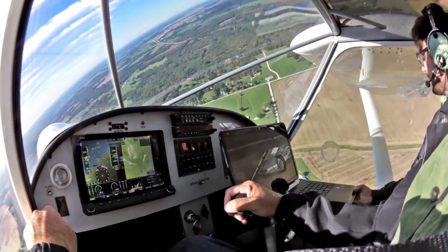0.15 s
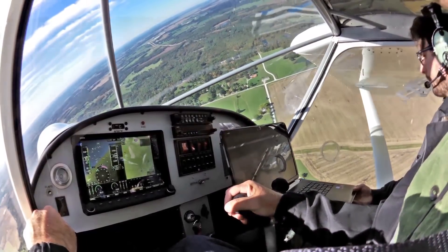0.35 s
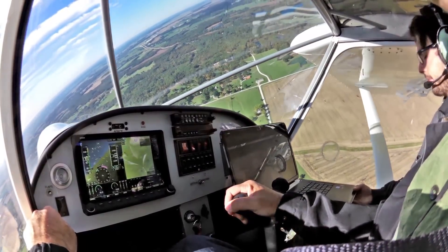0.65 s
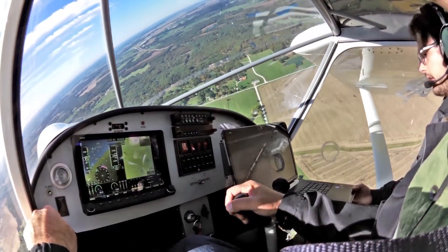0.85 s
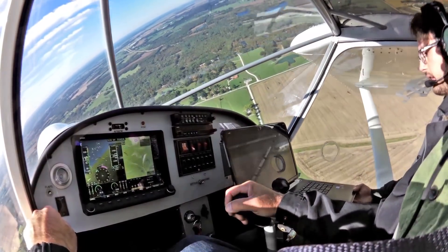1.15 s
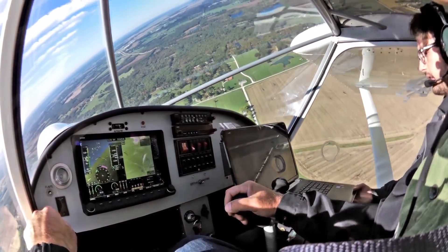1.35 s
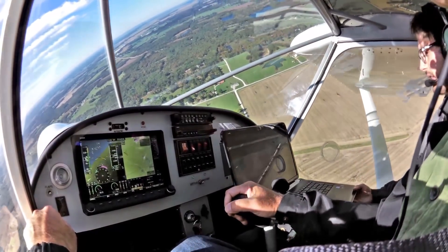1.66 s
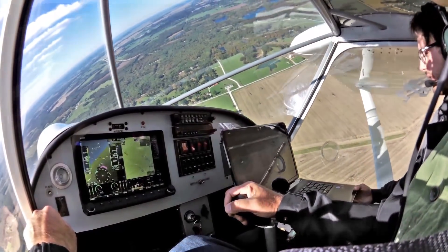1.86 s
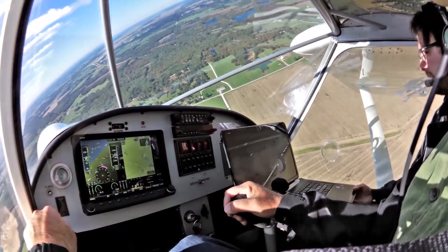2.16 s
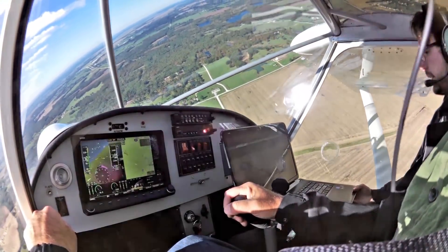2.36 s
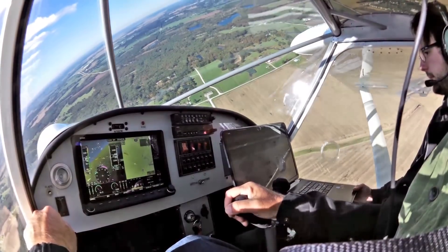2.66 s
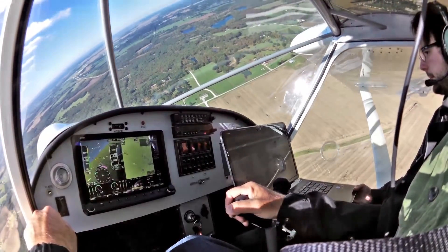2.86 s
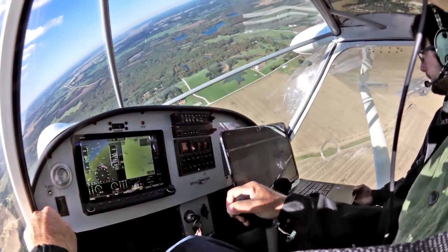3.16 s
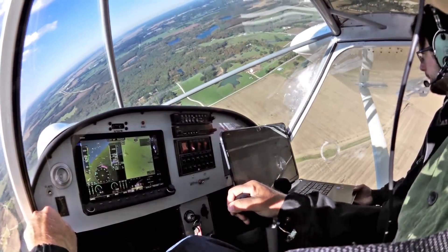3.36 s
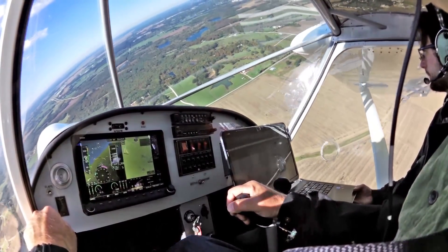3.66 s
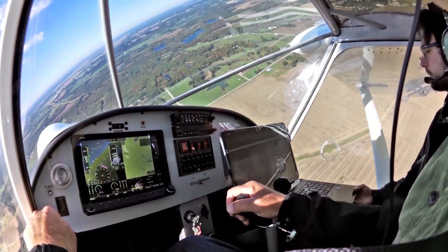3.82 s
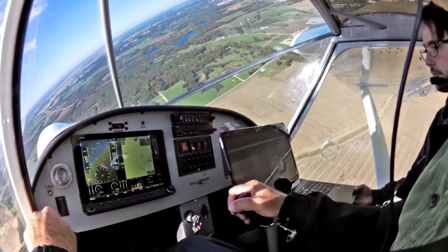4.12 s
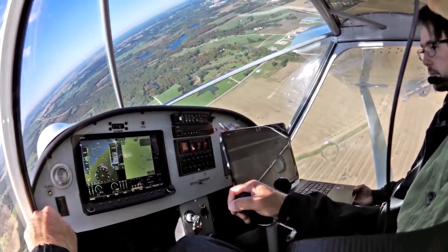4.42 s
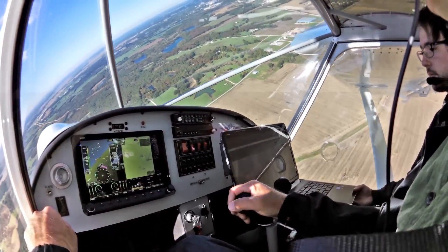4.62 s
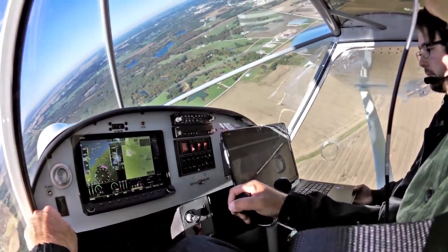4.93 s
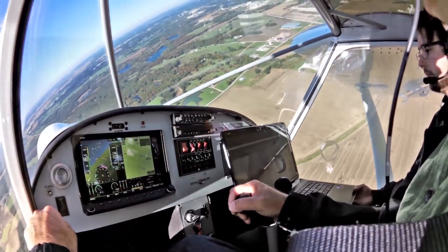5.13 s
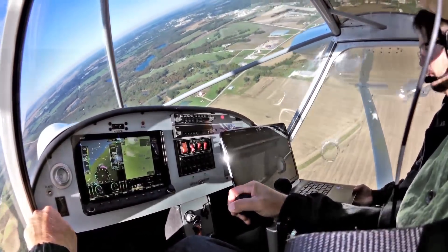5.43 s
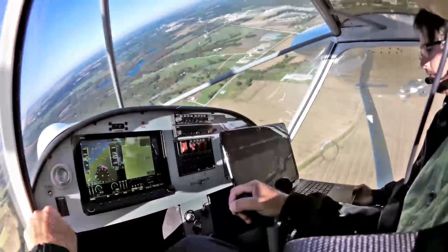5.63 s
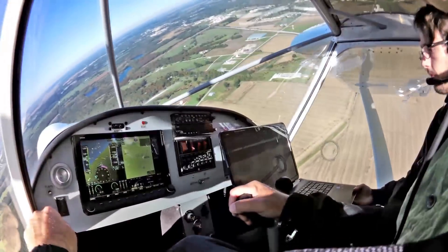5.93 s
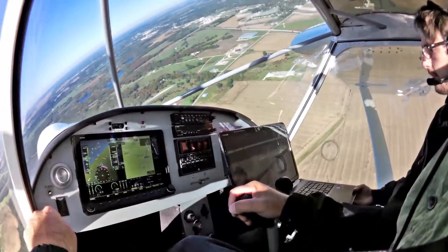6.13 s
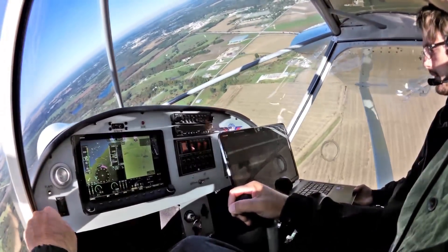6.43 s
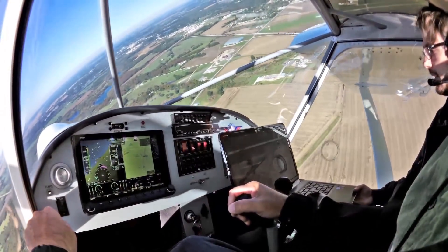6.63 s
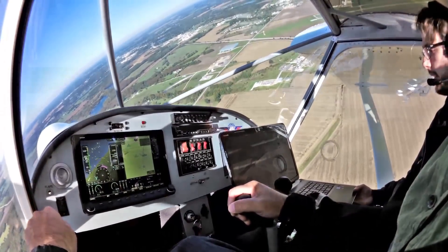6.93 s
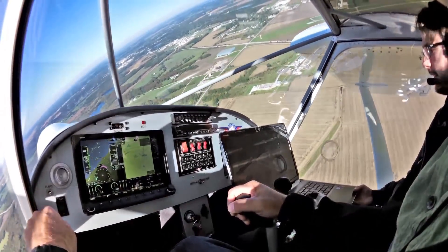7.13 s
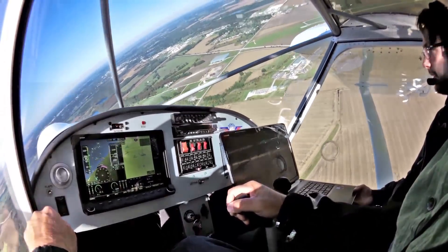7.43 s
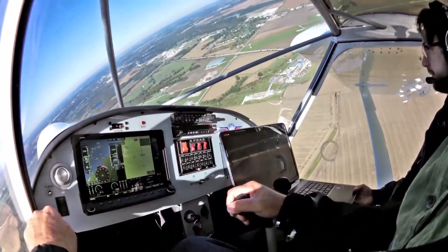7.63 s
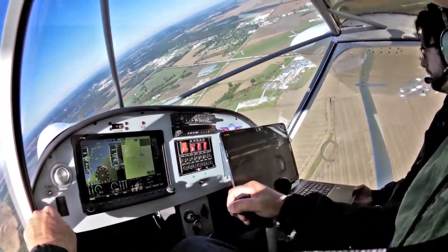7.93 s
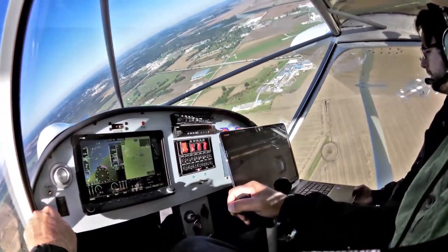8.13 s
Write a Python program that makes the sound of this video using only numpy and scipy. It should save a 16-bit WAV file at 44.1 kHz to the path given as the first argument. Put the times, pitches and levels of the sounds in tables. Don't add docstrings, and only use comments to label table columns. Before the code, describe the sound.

The sound starts mid-flight inside a small propeller aircraft, with a slight low jolt of rough air. A deep engine and propeller drone, around 75 pulses per second with strong buzzing harmonics, runs throughout, swaying slightly. Over it lies a steady, dark roar of air on the thin cabin skin, fluttering and gently gusting. Faint valve clatter, fine electrical ticking and slight hiss sit beneath. Around 1.4 s the drone's second harmonic dips; a lone soft tap comes at 2.3 s. Near 4.5 s the engine pitch rises very slightly, then the drone thins markedly about 5 s. A loose part taps faintly at 5.0, then quickly between 5.3 and 5.6 s, and once at 6.6 s, as the ticking weakens. Around 7.8 s low rumble swells with a dull tap, the drone fades again, and a brighter tap lands at 8.1 s before the cut at about 8.3 s.

```python
import sys
import numpy as np
from scipy import signal
from scipy.fft import rfft, irfft
from scipy.io import wavfile
from scipy.ndimage import uniform_filter1d

SR = 44100
rng = np.random.default_rng(int(sys.argv[2]) if len(sys.argv) > 2 else 0)


def gain_from_decibels(decibels):
    exponent = np.asarray(decibels, float) / 20
    return 10 ** exponent


def generate_wav(signal):
    frames = np.transpose(np.atleast_2d(signal))
    scaled = np.clip(frames, -1, 1) * 32767
    pcm = np.round(scaled).astype(np.int16)
    wavfile.write(sys.argv[1], SR, pcm)


N = 365148
T = np.arange(N) / SR
HZ = np.maximum(np.arange(N // 2 + 1) * SR / N, 1)


def level(x, db):
    return x * gain_from_decibels(db) / np.sqrt(np.mean(x ** 2))


def shape_db(points):
    hz, db = np.transpose(points)
    return np.interp(np.log(HZ), np.log(hz), db)


def causal(x, db):
    cepstrum = irfft(np.log(gain_from_decibels(db)), N)
    cepstrum[1:N // 2] *= 2
    cepstrum[N // 2 + 1:] = 0
    return irfft(rfft(x) * np.exp(rfft(cepstrum)), N)


def walk(rate_hz):
    hold = int(SR / rate_hz)
    steps = np.repeat(rng.standard_normal(N // hold + 1), hold)
    wander = uniform_filter1d(uniform_filter1d(steps, hold), hold)[:N]
    return (wander - wander.mean()) / wander.std()


def flutter(rate_hz):
    wander = walk(rate_hz)
    wander = wander - uniform_filter1d(wander, size=SR // 9)
    return wander / wander.std()


def hump(s, half_s):
    return np.exp(-((T - s) / half_s) ** 2)


def ticks(angle, places, sizes):
    at = np.interp(places, angle, np.arange(N), left=-1, right=-1)
    keep = (at >= 8) & (at < N - 8)
    index = at[keep].astype(int)[:, None] + np.arange(-5, 7)
    offset = index - at[keep][:, None]
    window = np.cos(np.pi * offset / 12) ** 2
    click = sizes[keep][:, None] * np.sinc(offset) * window
    return np.bincount(index.ravel(), click.ravel(), N)


BLADE_DB = [-27.5, -24.5, -28.5]
# (multiple of the two-turn engine cycle, level [dB rms])
WEAK_TONES = [(2, -45.3), (6, -39.2), (14, -36.4), (15, -45.6), (16, -42.5), (17, -46.8), (20, -45.4),
              (22, -40.8), (25, -45.2), (27, -48.0), (32, -51.5), (34, -46), (36, -49.3), (37, -41.3),
              (38, -52.6), (40, -59.5), (41, -47.6), (42, -54.4), (43, -56.9), (46, -58.6), (50, -61.6),
              (51, -62.8), (54, -63.0), (60, -56), (64, -67.5), (68, -66.8)]
# (time [s], half length [s], firing tone [dB], 2nd harmonic [dB], 3rd harmonic [dB])
BANKING_FADES = [
    (.2, .4, -1, 1.5, -1),
    (1.35, .6, 1.5, -6, 1),
    (3.5, .3, 1, -2, -2.5),
    (5.0, 0.31, -4, -7, -13),
    (5.75, .4, -1.5, -0.5, -5),
    (7.15, .25, -1, 0, 0.5),
    (8.0, .6, -2, -6.5, -9.5),
]


def drone(cycle):
    fade_db = sum(np.outer(depth_db, hump(s, half_s)) for s, half_s, *depth_db in BANKING_FADES)
    blade_tones = [(4 * k + 4, db + fade_db[k]) for k, db in enumerate(BLADE_DB)]
    out = 0
    for order, db in blade_tones + list(WEAK_TONES):
        sway = min(.015 * order, .7)
        phase = 2 * np.pi * (order * cycle + rng.random()) + sway * walk(1.516)
        strength = gain_from_decibels(db + 2.2 * sway * walk(3.2))
        out = out + strength * np.sqrt(2) * np.sin(phase)
    return out


# (frequency [Hz], level [dB per Hz])
SKIN_SPECTRUM = [(22, -41), (40, -17), (56, -16), (80, -4.5), (130, -2.5), (300, -5.5), (600, -11.5),
                 (1000, -21.5), (1600, -31.5), (2500, -37), (3800, -41), (5000, -55.5), (7000, -75),
                 (11000, -82)]
# (frequency [Hz], width [Hz], level [dB])
CABIN_RESONANCES = [(112, 59, 1), (202.4, 45, 6), (267, 11, 1.5), (318, 44, 1), (375, 25, -2.5),
                    (413, 32, 3.5), (473.6, 56, 6.5), (551.6, 37, 5), (663, 11, 1.5), (1104, 95, 3.5),
                    (1380, 72, 4.5), (3000, 60, 3.5), (4380, 460, 2.5)]


def cabin_db():
    resonances_db = sum(db / (1 + (2 * (HZ - hz) / width) ** 2) for hz, width, db in CABIN_RESONANCES)
    return shape_db(SKIN_SPECTRUM) + resonances_db


# (time [s], level [dB])
GUSTS = [(0, -.5), (.45, -0.7), (1.4, .5), (2.5, -0.5), (3.65, 0.15), (4.15, -1.1), (4.7, 0.6), (5.65, 1),
         (5.95, -1.15), (6.5, -0.5), (7.2, -1), (7.7, 1.1), (8.28, 0.1)]
# (time [s], half length [s], rumble level [dB])
AIR_BUMPS = [
    (0.05, 0.21, 3),
    (3.5, .35, -0.5),
    (7.8, .4, 2.5),
]
SWELL_HZ = [110, 380, 1100, 2700]
GUST_FOLLOWING = [.2, 1.4, 1.2, .8]
EDDY_SPREAD_DB = [.8, .4, .35, .2]
SWELL_BALANCE_DB = [0, .3, .2, -1.2]


def airflow():
    gust_db = np.interp(T, *np.transpose(GUSTS))
    swells_db = np.array([db + share * gust_db + eddy_db * walk(4.)
                          for db, share, eddy_db in zip(SWELL_BALANCE_DB, GUST_FOLLOWING, EDDY_SPREAD_DB)])
    swells_db[0] += sum(db * hump(s, half_s) for s, half_s, db in AIR_BUMPS)
    noise = rfft(rng.standard_normal(N)) * gain_from_decibels(cabin_db())
    low_buffet, high_buffet = flutter(50), flutter(46)
    out = 0
    for k in range(20):
        centre_hz = 16 * 2 ** (k / 2)
        band = np.cos(np.pi * np.clip(np.log2(HZ / centre_hz), -.5, .5)) ** 2
        shares = np.array([np.interp(np.log(centre_hz), np.log(SWELL_HZ), one) for one in np.eye(4)])
        swell_db = shares @ swells_db
        high = np.clip(np.log2(centre_hz / 300), 0, 1)
        buffet_db = 1.1 * (1 - high) * low_buffet + (.5 + .45 * high) * high_buffet
        flicker_db = 0.21 * flutter(25)
        out = out + irfft(noise * band, N) * gain_from_decibels(swell_db + buffet_db + flicker_db)
    return level(out, -20.5)


def clatter(cycle):
    places, sizes = rng.random(90), rng.standard_normal(90)
    turns = np.arange(-1, 160)[:, None]
    uneven = gain_from_decibels(1.5 * rng.standard_normal((161, 90)))
    knocks = ticks(cycle, (turns + places).ravel(), (sizes * uneven).ravel())
    bright_db = shape_db([(700, -28.5), (1500, 1.0), (5000, 0.5)])
    return level(causal(knocks, cabin_db() + bright_db), -55)


# (frequency [Hz], level [dB per Hz])
CABLE_SPECTRUM = [(300, -12), (1200, -2), (2500, 0), (3800, -1.5), (4500, -4.5), (5500, -9), (8000, -18.5),
                  (11500, -32.5), (14000, -44)]
CYLINDER_SHIFT = np.array([0, -.006, 0, .001])


def electrics(firing, spark_db):
    n, m = np.arange(640), np.arange(640 * 9)
    late, strength = rng.standard_normal((640, 2)).T
    scatter_db = 1 - .25 * np.interp(n, firing, spark_db)
    spark_places = n + np.take(CYLINDER_SHIFT, n % 4) + .0012 * late
    sparks = ticks(firing, spark_places, gain_from_decibels(scatter_db * strength))

    pole_db, pole_shift = 2.5 * rng.standard_normal(36), .02 * rng.standard_normal(36)
    diode_places = (m + .3) / 9 + pole_shift[m % 36] + .003 * rng.standard_normal(len(m))
    diode_db = pole_db[m % 36] + 2.5 * rng.standard_normal(len(m))
    ripple = ticks(firing, diode_places, gain_from_decibels(diode_db))

    cable_db = shape_db(CABLE_SPECTRUM)
    hiss = level(causal(rng.standard_normal(N), cable_db), -66.5)
    spark_ticks = gain_from_decibels(spark_db) * level(causal(sparks, cable_db), -57.5)
    alternator_ticks = level(causal(ripple, cable_db), -63.5)
    return spark_ticks - alternator_ticks + hiss


# (time [s], peak level [dB], ringing pitch [Hz])
PANEL_TAPS = [
    (2.3486, -38.5, 3460),
    (4.9501, -42, 3000),
    (5.2649, -40, 3400),
    (5.449, -39, 3240),
    (5.5548, -39, 3260),
    (6.6089, -40, 3260),
    (7.7433, -40, 3060),
    (8.1075, -33, 3700),
]


def rattle():
    out, t = np.zeros(N), T[:1024]
    burst_hz = np.arange(513) * SR / 1024
    age = t / .001
    swell_and_die = age ** 2 * np.exp(2 - age) / 4
    for s, db, hz in PANEL_TAPS:
        near_pitch = np.exp(-((burst_hz - hz) / 800) ** 2)
        scrape = irfft(rfft(rng.standard_normal(1024)) * near_pitch)
        ring = 0.7 * np.sin(2 * np.pi * hz * t) + level(scrape, -8)
        start = int(s * SR)
        out[start:start + len(t)] += gain_from_decibels(db - 1) * ring * swell_and_die
    return out


# (time [s], firing rate [Hz])
ENGINE_SPEED = [(0.0, 75.13), (0.9, 74.9), (2.25, 74.929), (3.2, 75.397), (4.1, 75.112), (4.35, 75.332),
                (4.7, 76.032), (5.95, 75.953), (6.5, 75.622), (7.15, 75.967), (7.7, 75.854), (8.28, 76.016)]
# (time [s], level [dB])
SPARK_PICKUP = [
    (0, 0),
    (2.7, 0),
    (4.5, -1.5),
    (5.85, -.9),
    (6.55, -5.6),
    (7.7, -4),
    (8.28, -1.9),
]


def scene():
    first_firing = -.111
    firing = np.cumsum(np.interp(T, *np.transpose(ENGINE_SPEED))) / SR + first_firing
    cycle = firing / 4
    spark_db = np.interp(T, *np.transpose(SPARK_PICKUP))
    sound = drone(cycle) + airflow() + clatter(cycle) + electrics(firing, spark_db) + rattle()
    return sound[None]


def band_limit(x):
    return signal.sosfilt(signal.butter(12, 12700, fs=SR, output="sos"), x)


def record(dry):
    return band_limit(dry)


dry = scene()
out = record(dry)
generate_wav(out)
```